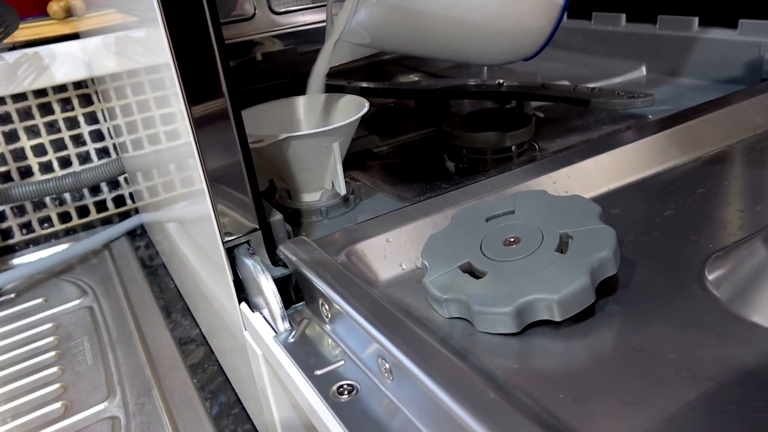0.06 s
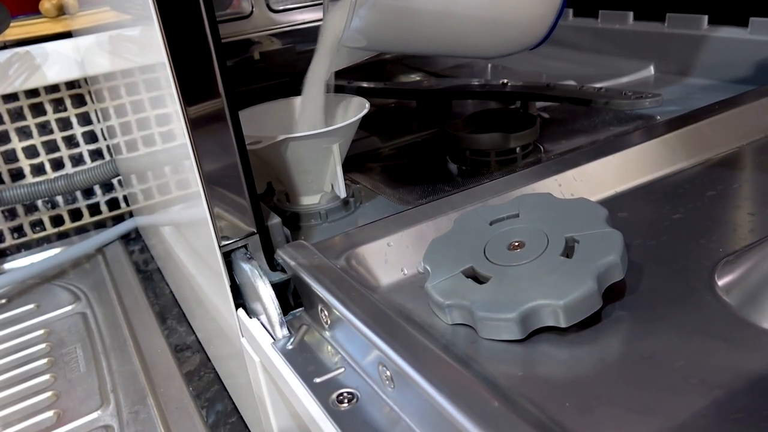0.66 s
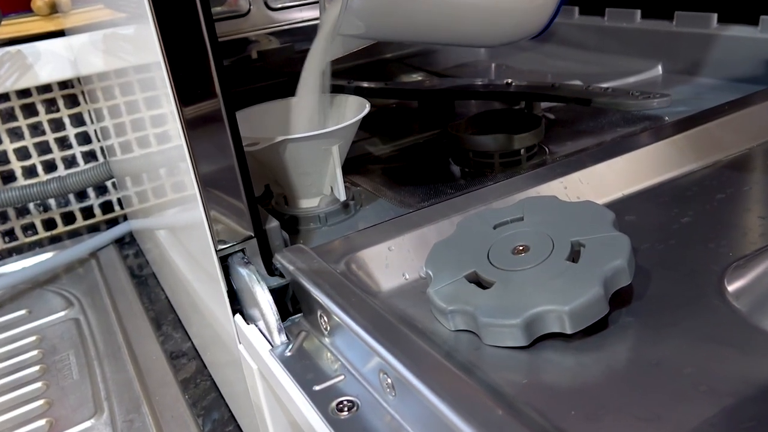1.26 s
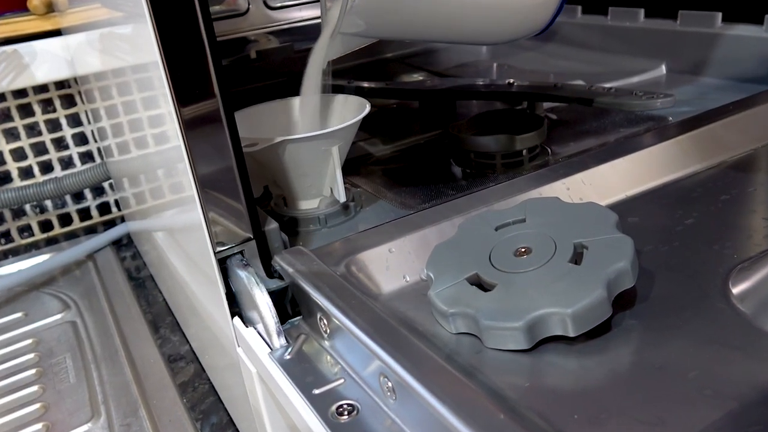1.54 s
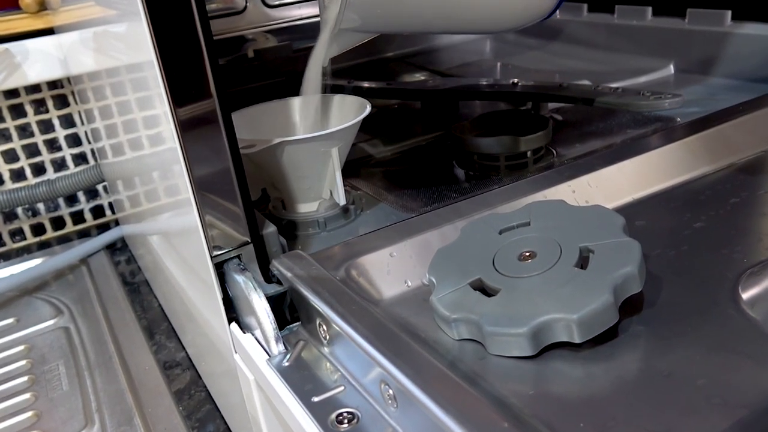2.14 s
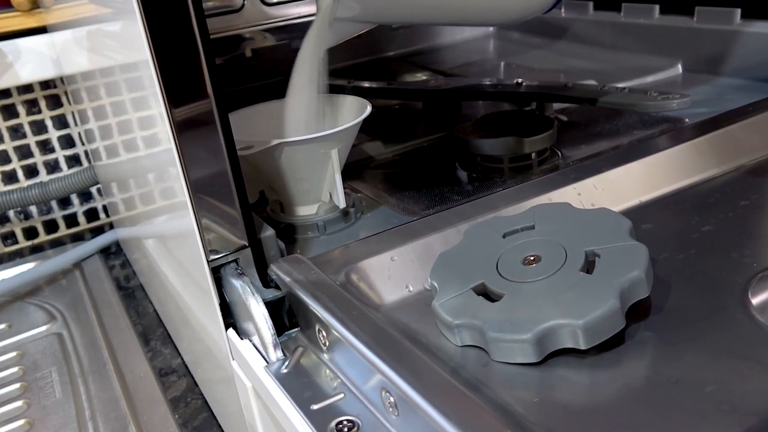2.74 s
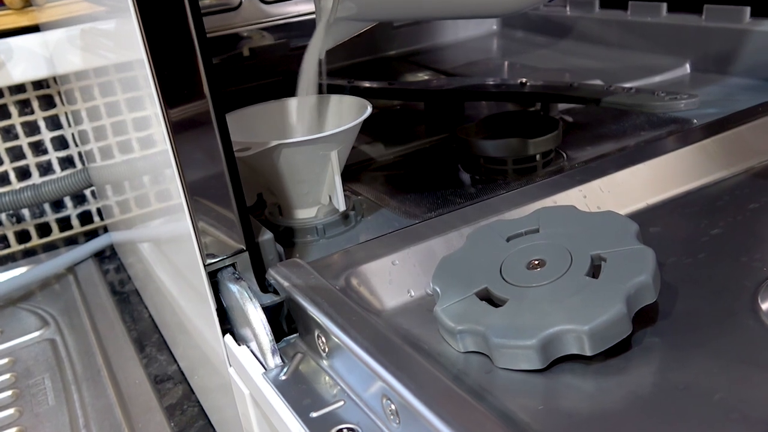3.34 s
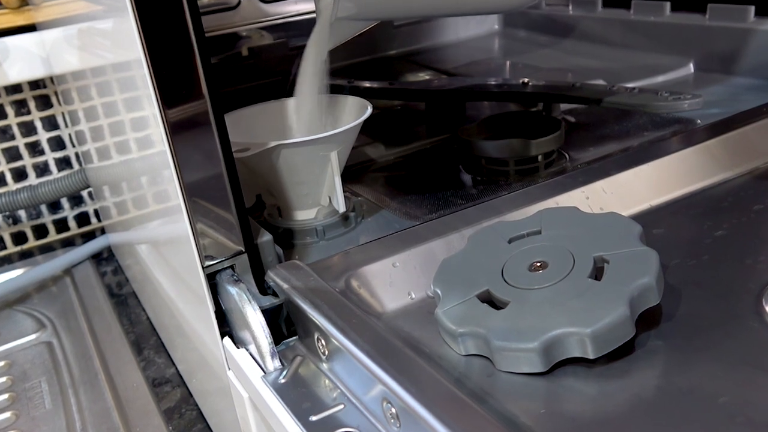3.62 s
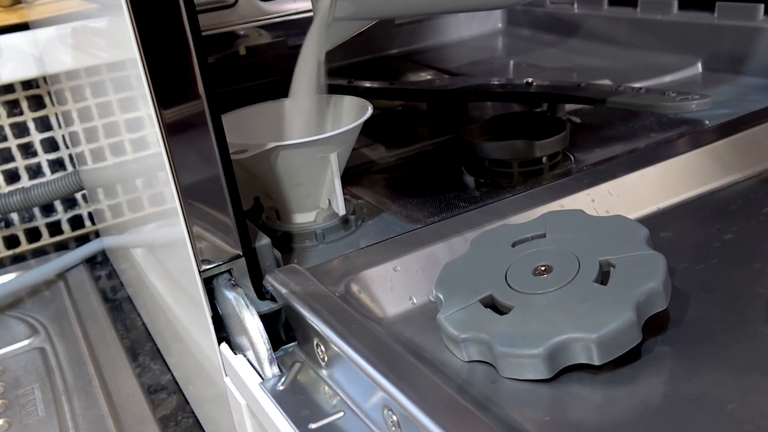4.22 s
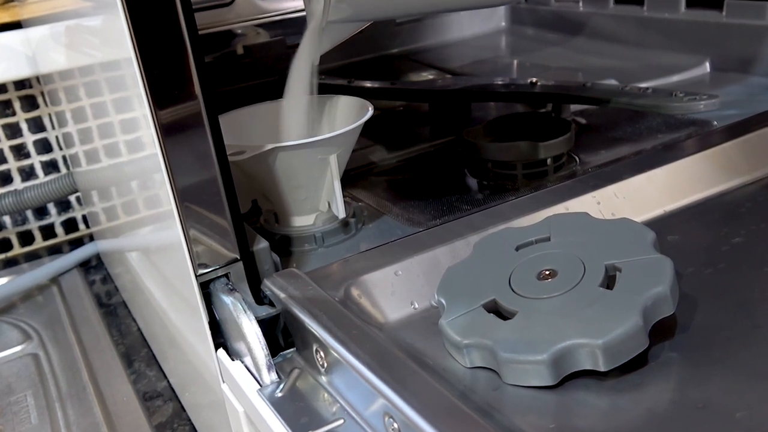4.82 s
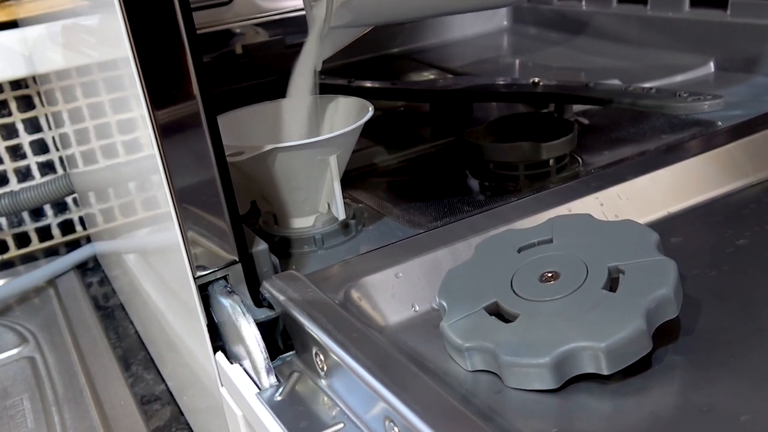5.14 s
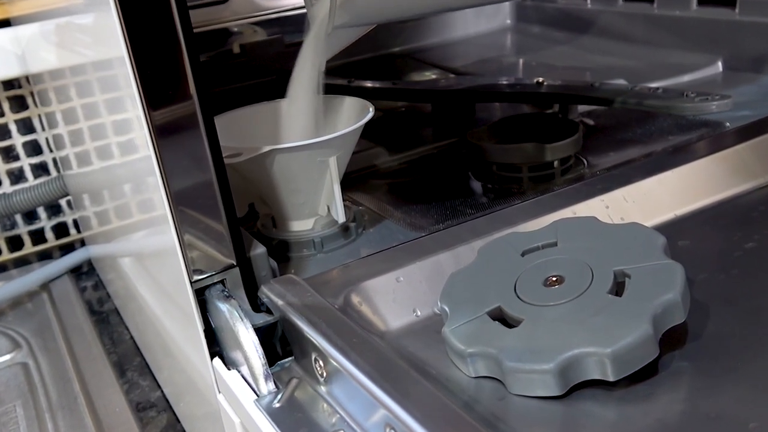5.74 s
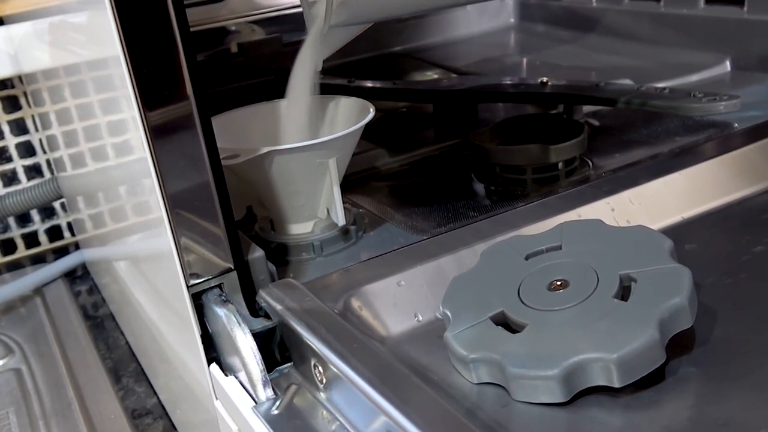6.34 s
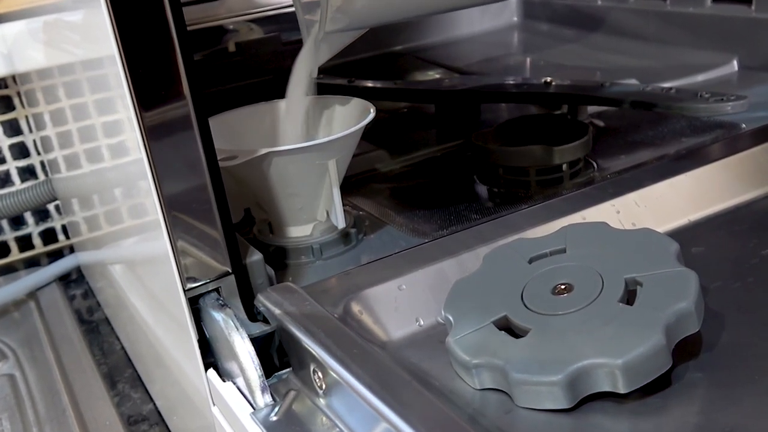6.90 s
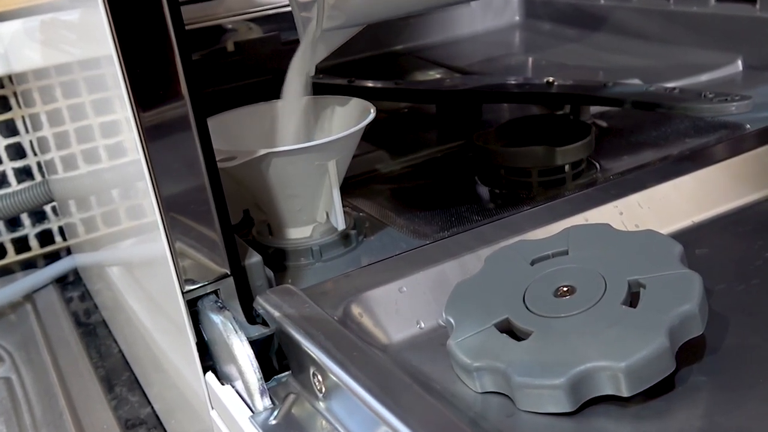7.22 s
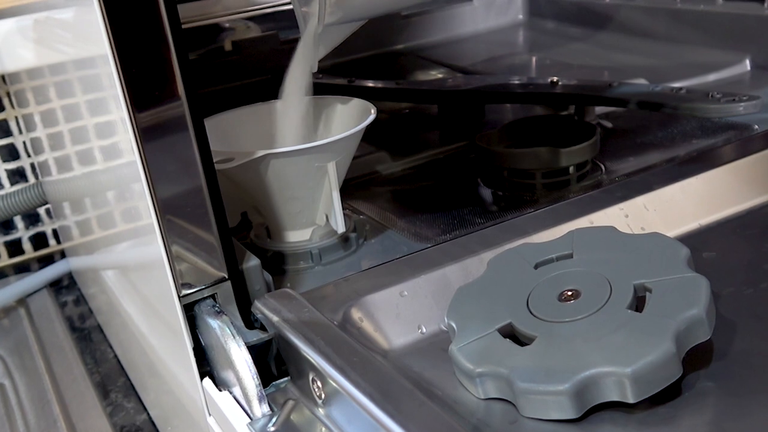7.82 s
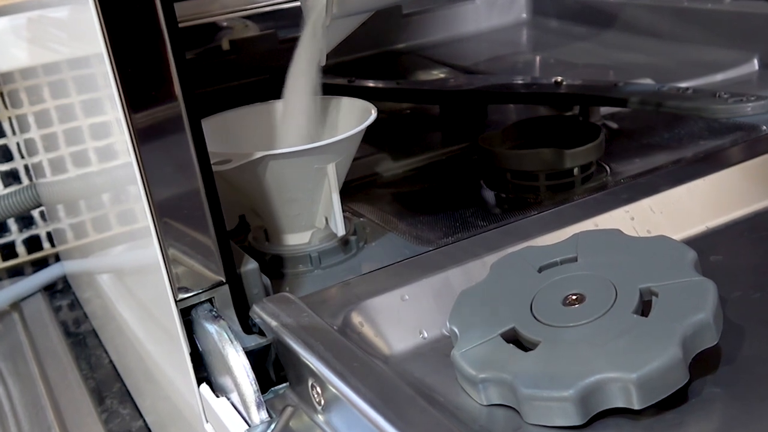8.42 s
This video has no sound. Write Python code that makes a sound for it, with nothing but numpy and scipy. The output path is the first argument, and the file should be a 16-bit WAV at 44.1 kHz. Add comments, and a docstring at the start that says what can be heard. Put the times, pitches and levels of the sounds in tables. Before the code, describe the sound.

In a quiet kitchen, coarse salt is poured from a jug through a plastic funnel into a dishwasher tank. Scattered clumps patter first, then a bright, grainy hiss swells and thins several times, growing into longer, steadier pours. The plastic rings lightly and the tank below sounds faintly hollow. The close microphone picks up a few soft handling bumps and one light knock on the funnel near the end.

```python
"""At a dishwasher in a quiet kitchen, coarse salt pours from a jug through a plastic funnel into the tank.
Crystals patter on the funnel wall in surges and clumps; the stream thins when the jug tips back.
Wall and cone ring, air in the throat hums, the tank sounds hollow, the steel tub adds close reflections.
The funnel takes one light knock; a hand softly bumps the microphone four times."""
import sys
import numpy as np
from scipy import signal
from scipy.fft import rfft, irfft
from scipy.io import wavfile
from scipy.ndimage import uniform_filter1d

SR = 44100
rng = np.random.default_rng(int(sys.argv[2]) if len(sys.argv) > 2 else 0)


def store_wav(level_fs):
    """Save 16-bit WAV to argv[1]."""
    pcm = np.round(np.clip(np.atleast_2d(level_fs), -1, 1) * 32767)
    wavfile.write(sys.argv[1], SR, pcm.T.astype(np.int16))


N = 377496
TIME_S = np.arange(N) / SR
FULL_FLOW_DB = -27


def wall(stream, surge, clumps, spot):
    """Crystals strike the funnel wall: bright ticks, ringing plastic, snaps from large crystals."""
    # tick spectrum: freq_hz, density_db
    impact = [(1000, -37), (3500, -21), (4700, -13), (4950, -12), (5200, -0.5), (5900, -3), (6600, 0.5),
              (8200, 0.5), (10000, -3.5), (12300, -6.5), (14000, -12.5), (15800, -16)]
    # wall resonances: freq_hz, width_hz, first_spot_db, second_spot_db
    wall_modes = [(4874, 45, -8, -8.5), (5220, 90, -9, -2.5), (5345, 45, -2.5, -3.5), (5610, 33, 2.5, -3),
                  (5970, 24, -6, -9), (6140, 170, -9, -4), (6330, 75, -0.5, 2), (6440, 136, -11, 0),
                  (6630, 160, -3.5, -8), (6990, 64, -0.5, -11.5), (7000, 25, -17, -8), (7320, 47, -23, -4),
                  (7460, 45, -2, -1.5), (7600, 110, -15, -5), (7970, 60, -17, -8), (8010, 39, -17, 5),
                  (8390, 78, -5, -5.5), (8760, 110, -22, -13), (8670, 40, -15, -10), (9450, 210, -9, -9),
                  (9700, 160, -2, -15), (9704, 59, -10, -2.5), (10030, 180, -11, -8),
                  (10750, 120, -7, -14.5), (11146, 95, -16, -1), (11245, 120, -11, -3.5),
                  (12200, 42, -18, -10)]
    # freq_hz, density_db
    snap_spectrum = [(2000, -36), (6000, -9), (10000, -2), (14000, 5), (16000, -10)]
    hits_per_s = 2500 + 11000 * stream / stream.max()
    patter = from_db(0.66 - 3.2 * spot) * stream * surge * grains(hits_per_s, spread_db=4)
    bursts = from_db(-5.5) * clumps * grains(28000, spread_db=0)
    ticks = colour(patter + bursts, impact)
    strikes = np.hypot(stream * surge, from_db(-13) * clumps) * grains(hits_per_s, spread_db=14.5)
    rings = ring(strikes, wall_modes, spot)
    snaps = colour(stream * grains(45, spread_db=-0.5), snap_spectrum)
    direct = ticks + from_db(-1.75) * rings + from_db(-17.5) * snaps
    return direct + from_db(-10) * tub(direct, t60_s=0.076)


def pour_db(time_s, down_cone=False):
    """Flow on the wall or down the cone, re full flow: each jug tilt swells, holds and thins out."""
    # jug tilts, the faint ones dribbles:
    # full_s, back_s, level_db, sag_db_per_s, swell_db_per_s, thinning_db_per_s, cone_extra_db
    tilts = [(0.0, 0.016, -42, 0, 50, 56, 4), (0.692, 1.23, -28, -4.5, 50, 30, 2),
             (1.325, 1.523, -28, -2, 52, 47, 0.5), (1.79, 2.117, -38.5, 10.5, 50, 161, -7),
             (2.605, 2.954, -26, -1, 59, 42, 1), (3.146, 3.317, -29.5, 24.5, 40, 63, -1),
             (3.858, 5.21, -28, -0.47, 50, 39, 0), (5.557, 6.803, -25.5, 2, 41, 77, 0),
             (6.913, 8.134, -27.5, 1.15, 61, 61, 0), (8.426, 8.467, -25, 0, 51, 41, 0)]
    flows_db = [level_db + extra_db * down_cone
                - sag * np.clip(time_s - full_s, 0, back_s - full_s)
                - swell * np.maximum(full_s - time_s, 0)
                - thinning * np.maximum(time_s - back_s, 0)
                for full_s, back_s, level_db, sag, swell, thinning, extra_db in tilts]
    return np.max(flows_db, axis=0) - FULL_FLOW_DB


def outflow_db(lag_s):
    """Delayed flow through the spout, re full flow; at first, salt already in the funnel drains."""
    time_s = TIME_S - lag_s
    drain_db = -8.5 - 12 * time_s
    return np.maximum(pour_db(time_s, down_cone=True), drain_db)


def waver_db(depth_db, step_s):
    """The unsteady hand swings the flow slowly."""
    knots_s = np.arange(0, TIME_S[-1] + 1, step_s)
    return depth_db * np.interp(TIME_S, knots_s, rng.standard_normal(N)[:len(knots_s)])


def surges(flow_db, per_s, fade_s, steady_share, span_s):
    """Gain of lumps that land at once and scatter: a thin stream breaks up, a thick one runs smoother."""
    lumps = (rng.random(N) < per_s / SR) * rng.uniform(0.084, 1, N)
    power = signal.lfilter([1], [1, -np.exp(-1 / (fade_s * SR))], lumps + 1e-18)
    power = steady_share + (1 - steady_share) * power / power.mean()
    levelled = np.sqrt(power / uniform_filter1d(power, int(span_s * SR)))
    lumpiness = np.clip(0.89 - 0.05 * flow_db, 0.4, 1.2)
    return levelled ** lumpiness


def falling_clumps():
    """Envelope of clumps that drop off the jug's lip and scatter."""
    # clump landings: start_s, level_db
    landings = [(0.0014,-21.5), (0.037,-27), (0.1658,-31), (0.2259,-33), (0.264,-31.5), (0.37,-30.5),
                (0.3942,-20), (0.4646,-25), (0.4962,-23), (0.563,-17.5), (0.627,-21), (0.648,-18),
                (1.664,-17), (1.7246,-20), (1.791,-24.5), (1.924,-27), (2.0207,-25), (2.2106,-23),
                (2.301,-24), (2.354,-23), (2.4,-25.5), (3.079,-14), (3.124,-15), (3.292,-33), (3.3743,-18),
                (3.6096,-17), (3.7382,-19), (3.8472,-17), (4.041,-18), (4.516,-14.5), (5.273,-16),
                (5.4415,-15), (5.474,-14.5), (6.711,-16.5), (6.8015,-16), (6.9237,-14), (7.642,-17),
                (7.72,-15.5), (8.1195,-22)]
    return decays(landings, t60_s=0.06)


def scatter(stream, surge, clumps):
    """Crystals bounce off to either side and widen the hiss."""
    # bounce spectrum: freq_hz, density_db
    bounce = [(4500, -49), (5800, 10), (7000, 8.5), (10000, 8.5), (13000, 1), (15500, -26)]
    hits = np.hypot(stream * surge, from_db(-4.5) * clumps) * grains(12000, spread_db=4)
    return from_db(-16.5) * colour(hits, bounce) * [[1], [-1]]


def cone(hand_db, surge, clumps, spot):
    """Sliding salt makes the cone rustle and ring; a trickle goes on between pours."""
    # rustle spectrum: freq_hz, density_db
    rustle_spectrum = [(250, -21), (700, -9.5), (950, -13.5), (1200, -3), (1700, -2.5), (2150, -3.5),
                       (2650, -0.5), (3300, -2.5), (3900, -4), (4700, 1), (6000, -13)]
    # cone resonances: freq_hz, width_hz, first_spot_db, second_spot_db
    cone_modes = [(857, 34, -14, -11), (1041, 33, -7, -18), (1166, 21, -12, -5.5), (1320, 19, -5.5, -11),
                  (1706, 31, -20, -0.5), (1970, 19, -35, -7.5), (2440, 24, -35, -48), (2632, 45, -12, -3.5),
                  (2730, 65, -10.5, -9.5), (2992, 33, -4.5, 4.5), (3460, 16, -4, -6),
                  (3681, 79, -1.5, -2.5), (4220, 30, -13, 5.5), (4380, 98, -6.5, -16), (4574, 27, 4, -4)]
    poured = from_db(-41 + pour_db(TIME_S, down_cone=True) + hand_db - 2.5 * spot)
    trickle = from_db(-53.5)
    sliding = np.hypot(poured, trickle) * surge ** 0.67
    drive = np.hypot(sliding, from_db(-22) * clumps)
    rustle = colour(drive * grains(6000, spread_db=4), rustle_spectrum)
    rings = ring(drive * grains(7000, spread_db=4), cone_modes, spot)
    return from_db(-1) * rustle + from_db(-1.5) * rings


def throat(hand_db, surge, spot):
    """Air in the funnel throat hums once the salt has slid down the cone."""
    # air resonances: freq_hz, width_hz, level_db
    throat_modes = [(1501, 45, 4.5), (1627, 46, -6)]
    drive_db = -46.65 + 1.03 * (outflow_db(lag_s=0.021) + hand_db) - 0.1 * spot
    return ring(from_db(drive_db) * surge ** 0.98 * grains(5000, spread_db=3), throat_modes)


def tank():
    """Salt trickles into the hollow tank; filling quiets it, the lowest resonance most."""
    # tank resonances: freq_hz, width_hz, empty_db, fuller_db
    tank_modes = [(103.6, 8.3, -12.5, -42), (178, 10, -10, -10.5), (310.6, 21.8, -3.5, -5.5),
                  (382.8, 29.8, -1, 0.5), (440.4, 30.6, -0.5, -4.5), (559.7, 23.4, -8, -1.5)]
    fill_db_per_s = -0.36
    drive_db = -52 + 0.39 * outflow_db(lag_s=0.028) + fill_db_per_s * TIME_S
    return ring(from_db(drive_db) * grains(3000, spread_db=4), tank_modes, blend=TIME_S / TIME_S[-1])


def knock():
    """A light, dull knock on the funnel."""
    # funnel knock: start_s, level_db
    hits = [(7.534, -34.5)]
    push = decays(hits, t60_s=0.077) * rng.standard_normal(N)
    return colour(push, [(150, -31), (450, 1), (900, -10), (1500, 6), (2500, -7), (5000, -25)])


def bumps():
    """A hand bumps the microphone body: a brief soft push, then a low shudder."""
    # hand contacts: start_s, level_db
    contacts = [(0.785, -55), (2.93, -61), (5.195, -58), (6.968, -52)]
    push = sum(from_db(db) * np.exp(-((TIME_S - start_s - 0.004) / 0.0011) ** 2)
               for start_s, db in contacts)
    thud = signal.sosfilt(signal.butter(2, 45, "high", fs=SR, output="sos"), push + 1e-18)
    shake = decays(contacts, t60_s=0.09) * rng.standard_normal(N)
    shudder = colour(shake, [(20, 1), (60, -8), (180, -2), (300, -14), (900, -45)])
    return from_db(7) * thud + from_db(-2) * shudder


def tub(x, t60_s):
    """Dense early reflections from the steel walls."""
    age_s = np.arange(int(t60_s * SR)) / SR
    tail = rng.standard_normal(len(age_s)) * from_db(-60 * age_s / t60_s) * (age_s > 0.001)
    return signal.oaconvolve(x, tail / np.linalg.norm(tail))[:N]


def stereo(x, right_share, diffuse_db, band_hz):
    """Within a band, the sound leans right and its reflections differ between the sides."""
    side = from_db(diffuse_db) * tub(x, t60_s=0.087) - right_share * x
    side = signal.sosfiltfilt(signal.butter(5, band_hz, "band", fs=SR, output="sos"), side)
    return x + side * [[1], [-1]]


def kitchen():
    """Faint, low room noise with a weaker diffuse part."""
    # room noise spectrum: freq_hz, density_db
    air_spectrum = [(20, -4), (60, 5.5), (170, 6), (250, 0.5), (700, 2.5), (2000, -9.5), (8000, -26),
                    (16000, -7)]
    diffuse_spectrum = [(20, -3), (170, 0), (400, -1), (1000, -6), (1600, -12), (4000, -52)]
    air = colour(rng.standard_normal(N), air_spectrum)
    diffuse = colour(rng.standard_normal(N), diffuse_spectrum)
    return from_db(-66.5) * air + from_db(-76) * diffuse * [[1], [-1]]


def grains(per_s, spread_db):
    """Clicks of single crystals of uneven size; about unit power at any rate."""
    chance = np.clip(per_s / SR, 1e-4, 1)
    size, sign = rng.standard_normal(N), np.sign(rng.random(N) - 0.5)
    hits = rng.random(N) < chance
    gains = from_db(spread_db * np.clip(size[hits], -2, 2))
    clicks = np.zeros(N)
    clicks[hits] = sign[hits] * gains / np.sqrt(np.mean(gains ** 2) + 1e-20)
    return clicks / np.sqrt(chance)


def decays(events, t60_s):
    """Envelope that jumps at each (start_s, level_db) and dies away."""
    envelope = np.zeros(N)
    for start_s, level_db in events:
        start = int(start_s * SR)
        age_s = np.arange(min(int(2 * t60_s * SR), N - start)) / SR
        envelope[start:start + len(age_s)] += from_db(level_db - 60 * age_s / t60_s)
    return envelope


def ring(x, modes, blend=0):
    """Parallel resonances of alternating sign, blended from their first to their last dB column."""
    total, power = 0, 0
    for k, (freq_hz, width_hz, *levels_db) in enumerate(modes):
        first, last = from_db(levels_db[0]), from_db(levels_db[-1])
        radius = np.exp(-np.pi * width_hz / SR)
        feedforward = np.array([1, 0, -1]) * (1 - radius ** 2) / 2
        feedback = [1, -2 * radius * np.cos(2 * np.pi * freq_hz / SR), radius ** 2]
        gain = first + blend * (last - first)
        total = total + (-1) ** k * gain * signal.lfilter(feedforward, feedback, x + 1e-18)
        power += last ** 2 * np.pi * width_hz / SR
    return total / np.sqrt(power)


def colour(x, spectrum, size=4096):
    """Minimum-phase filter of unit power gain through (freq_hz, density_db) points."""
    freq_hz, density_db = np.transpose(spectrum)
    grid_hz = np.maximum(np.fft.rfftfreq(size, 1 / SR), 1)
    gain = from_db(np.interp(np.log(grid_hz), np.log(freq_hz), density_db))
    cepstrum = irfft(np.log(gain))
    response = irfft(np.exp(rfft(2 * cepstrum[:size // 2], size)))
    return signal.oaconvolve(x, response / np.linalg.norm(response))[:N]


def from_db(db):
    """Decibels to gain."""
    return 10 ** (np.asarray(db) / 20)


def scene():
    """One pour, slightly to the right, drives wall, cone, throat and tank over the kitchen noise."""
    # landing point in the funnel: time_s, position (0 = first spot, 1 = second spot)
    landing_path = [(0, 0.16), (1.6, 0.21), (3.1, 0.072), (3.9, 0.57), (4.8, 0.73), (8.0, 0.77),
                    (8.56, 0.69)]
    spot = np.interp(TIME_S, *np.transpose(landing_path))
    hand_db = waver_db(depth_db=0.48, step_s=0.1)
    flow_db = pour_db(TIME_S) + hand_db
    stream = from_db(FULL_FLOW_DB + flow_db)
    surge = surges(flow_db, per_s=93, fade_s=0.0054, steady_share=0.56, span_s=0.082)
    clumps = falling_clumps()
    patter = wall(stream, surge, clumps, spot)
    hiss = stereo(patter, right_share=0.092, diffuse_db=-14, band_hz=(5780, 14000))
    funnel = cone(hand_db, surge, clumps, spot) + throat(hand_db, surge, spot) + knock()
    body = stereo(funnel, right_share=0, diffuse_db=-36, band_hz=(200, 1270))
    hollow = stereo(tank() + bumps(), right_share=0.12, diffuse_db=-13, band_hz=(25, 547))
    return hiss + body + hollow + kitchen() + scatter(stream, surge, clumps)


def record(dry):
    """Steep low-pass on the top treble."""
    cutoff_hz = 15850
    return signal.sosfilt(signal.ellip(12, 0.1, 90, cutoff_hz, fs=SR, output="sos"), dry)


dry = scene()
out = record(dry)
store_wav(out)
```